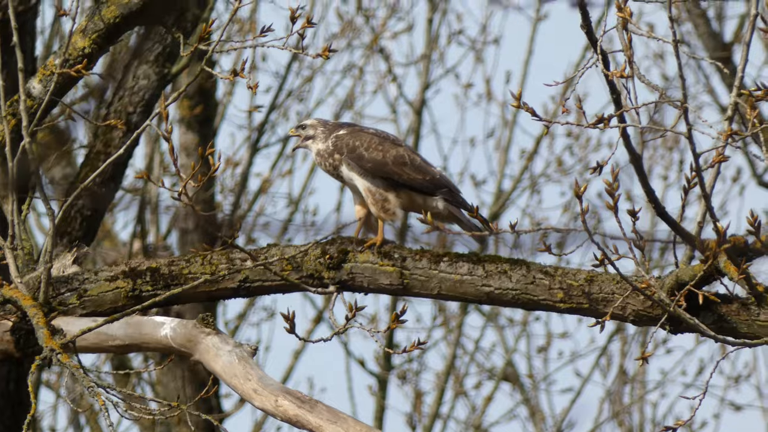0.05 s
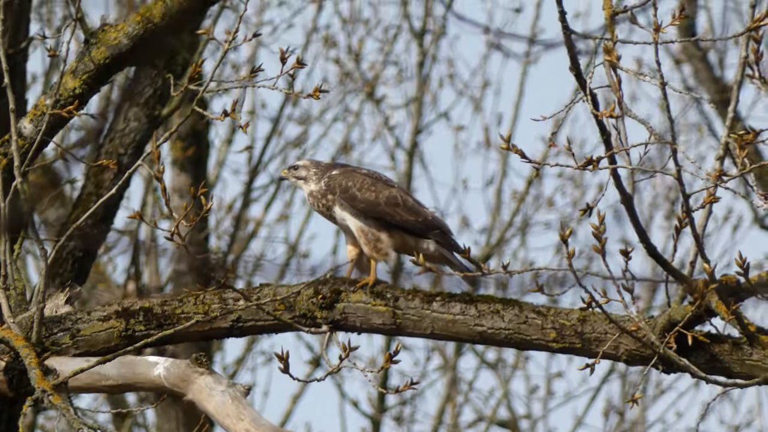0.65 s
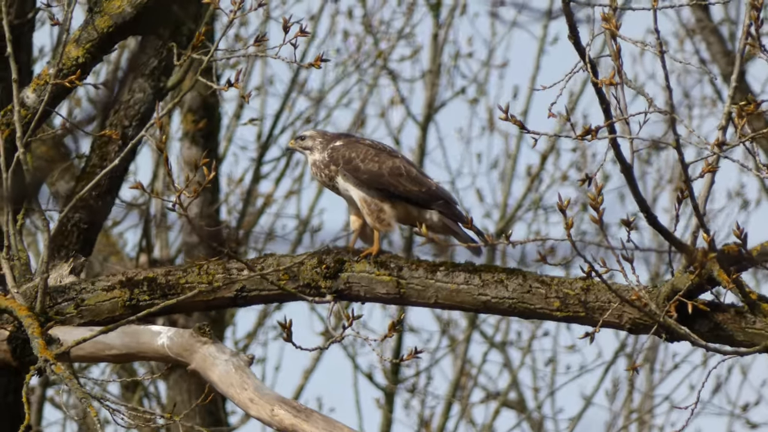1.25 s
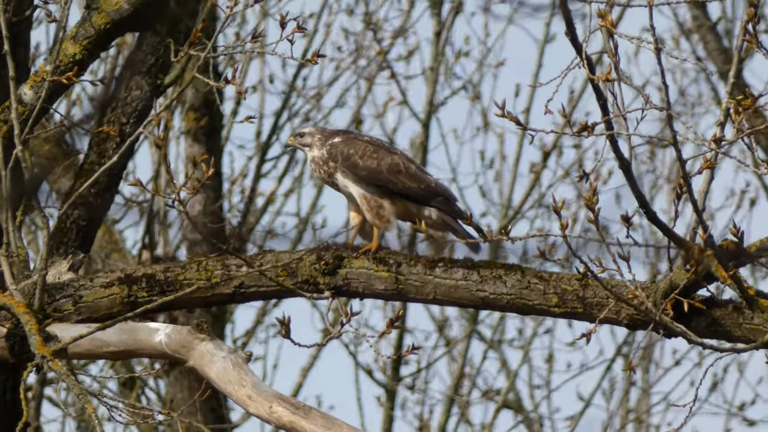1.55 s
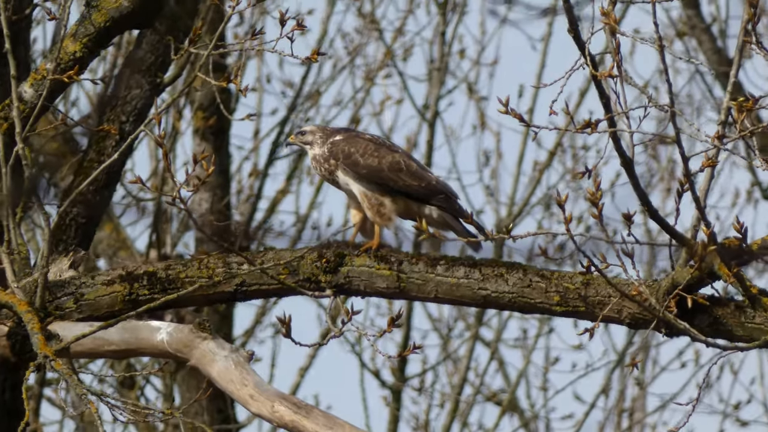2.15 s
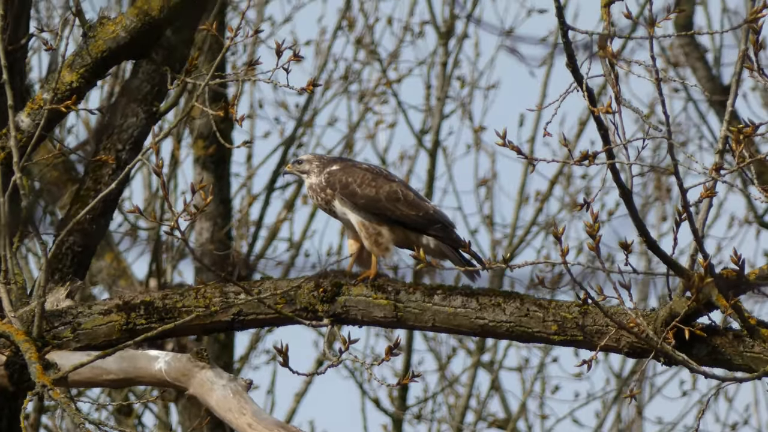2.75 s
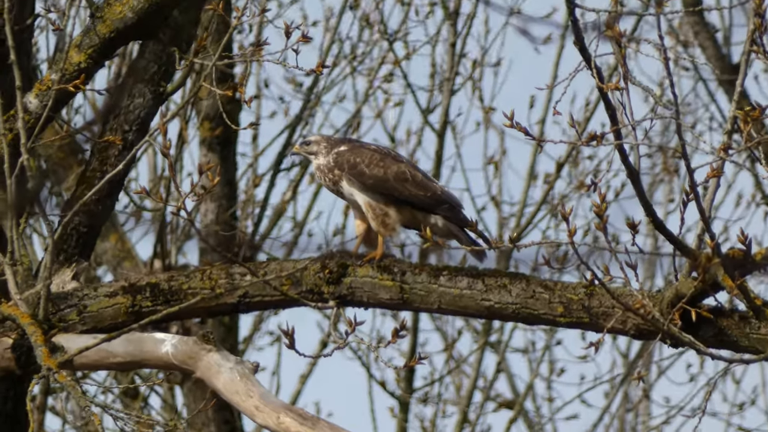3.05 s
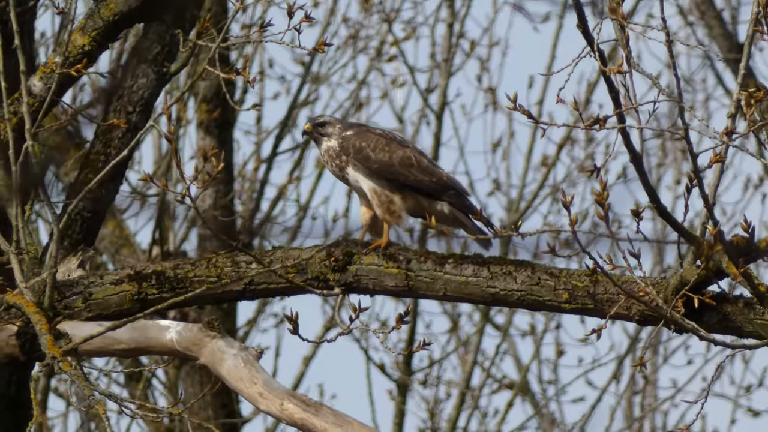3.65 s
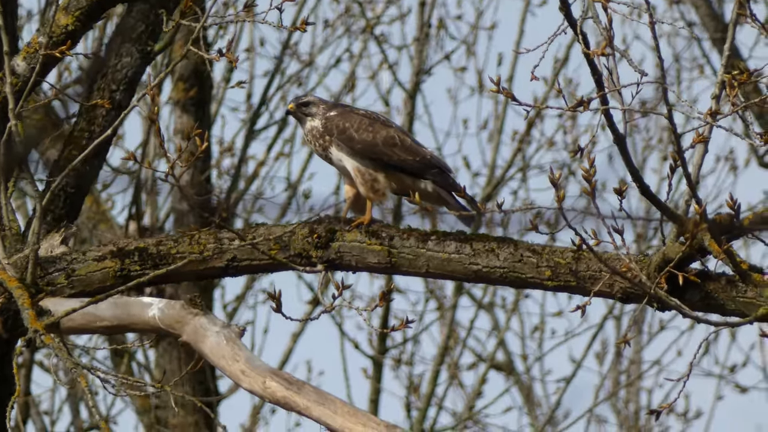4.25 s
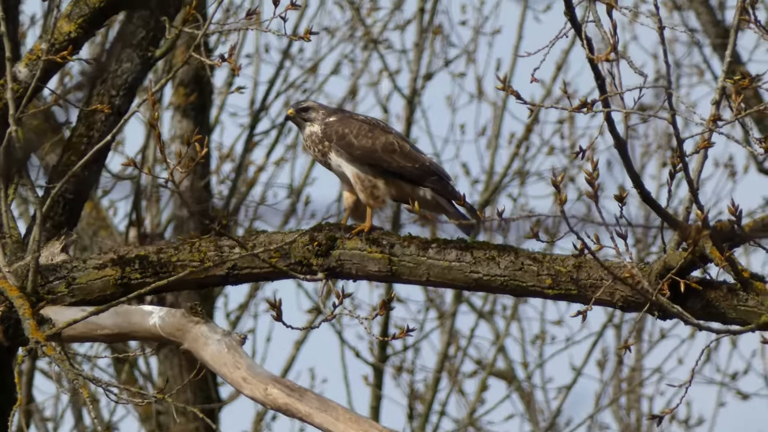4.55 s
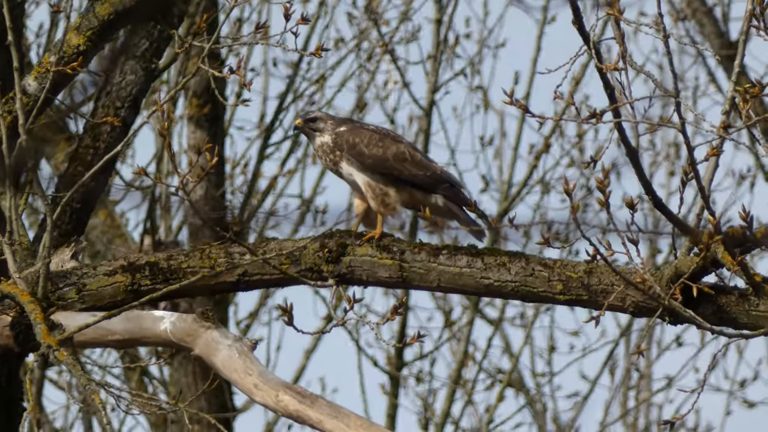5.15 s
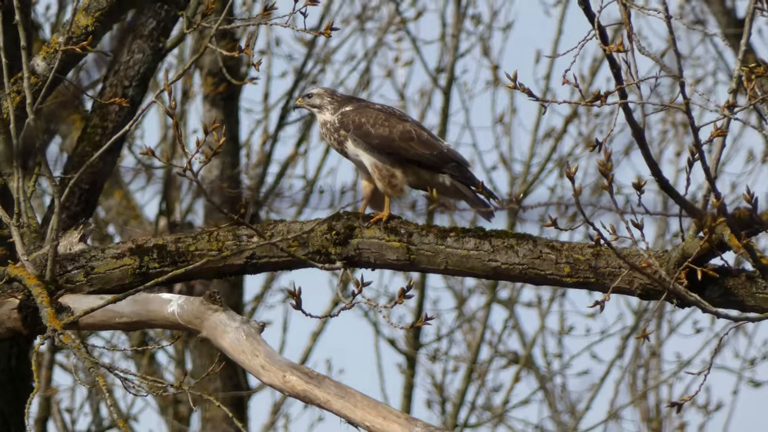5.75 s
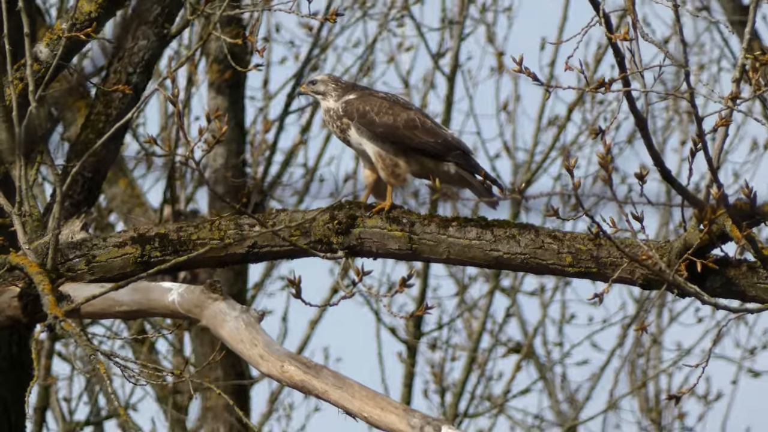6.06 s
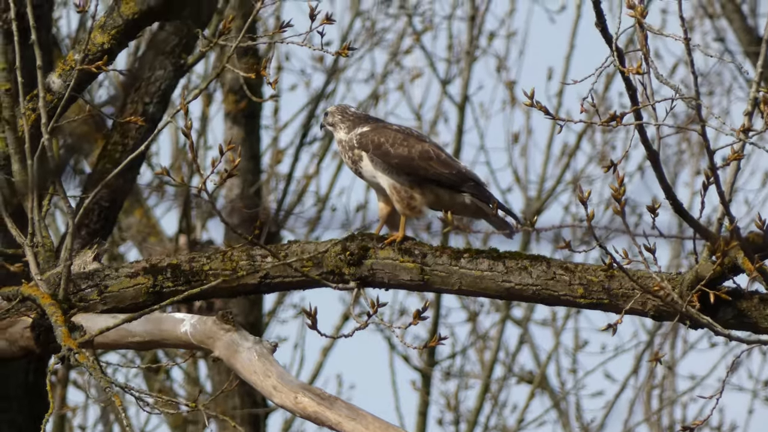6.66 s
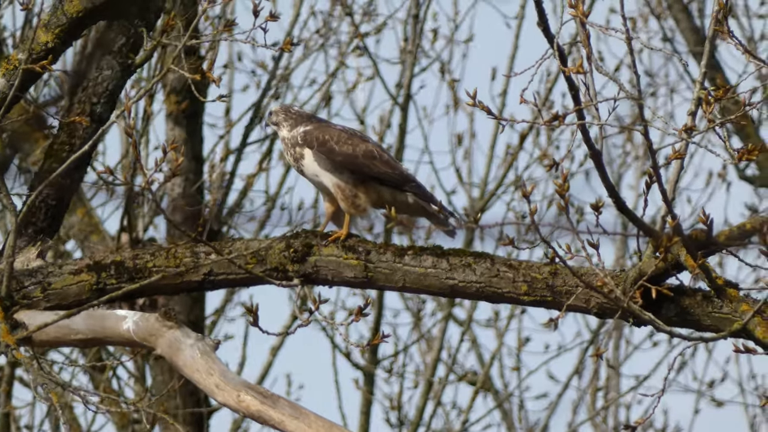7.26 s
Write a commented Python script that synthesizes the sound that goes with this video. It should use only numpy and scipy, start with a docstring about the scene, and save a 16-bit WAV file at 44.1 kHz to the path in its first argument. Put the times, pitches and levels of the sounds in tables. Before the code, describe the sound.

In a quiet wood, a single high, slightly rough buzzard call slides downward and fades among the trees. Distant songbirds follow with pips, gliding whistles and quick falling chirps, growing louder before thinning out near the end. Throughout, the microphone picks up steady hiss, the faint whirr of the camera's lens and a low rumble with light gusts, while soft knocks, dry ticks and brief rustles come from handling.

```python
"""In a wood, a buzzard on a branch gives one hoarse, falling mew, and the trees throw it back.
Its voice is a few harmonics shaped by the throat and open beak. Farther off, small birds twitter in
gliding whistles and fast buzzes, over a low outdoor rumble and a little wind on the microphone.
Close up, a camera adds the soft whirr of its lens motor, hiss, and handling bumps, ticks and rustles."""
import sys
import numpy as np
from scipy import signal
from scipy.fft import rfft, irfft
from scipy.io import wavfile

SR = 44100
rng = np.random.default_rng(int(sys.argv[2]) if len(sys.argv) > 2 else 0)


def transcribe(signal):
    """Save signal, clipped to [-1, 1], as a 16-bit WAV file at the path in sys.argv[1]."""
    frames = np.atleast_2d(signal).T
    limited = np.clip(frames, -1, 1)
    pcm = np.round(limited * 32767).astype(np.int16)
    wavfile.write(sys.argv[1], SR, pcm)


N = 330750
TIME = np.arange(N) / SR
HZ = np.fft.rfftfreq(N, 1 / SR)
SIDES = np.array([[1], [-1]])  # left, right


def amp(db):
    """Decibels to gain."""
    return 10 ** (np.asarray(db) / 20)


def unit(x):
    """Scales to an rms of one."""
    return x / np.sqrt(np.mean(x ** 2) + 1e-20)


def curve_at(points, hz):
    """Reads a curve on a log-frequency axis."""
    freqs, values = np.transpose(points)
    return np.interp(np.log(hz + 1), np.log(freqs + 1), values)


def follow(rows, t=TIME):
    """Every lane of an automation table at the times t."""
    times, *lanes = np.transpose(rows)
    return [np.interp(t, times, lane) for lane in lanes]


def add(mix, s, sound):
    """Drops a sound into the mix at s seconds."""
    part = mix[max(round(s * SR), 0):][:len(sound)]
    part += sound[:len(part)]


def noise(gain):
    """Unit-rms noise, coloured by a gain at each frequency."""
    return unit(irfft(rfft(rng.standard_normal(N)) * gain, N))


def wander(hz):
    """A smooth random modulator that moves up to about hz times a second."""
    return noise(np.exp(-(HZ / hz) ** 2))


# colour of the rumble and of the wind: (frequency [Hz], level [dB])
RUMBLE_EQ = [(25, -50), (50, -37), (80, -25), (120, -5), (155, 0.5), (220, -1.5), (310, -6), (600, -18),
             (1000, -35), (2000, -62)]
WIND_EQ = [(15, -40), (35, -13), (60, -5), (85, 5.5), (130, 5.5), (250, -42)]
# the bed between swells: (time [s], rumble [dB], wind [dB])
CALM = [(0, -65, -78), (4.4, -67, -84.5), (7, -68, -82), (7.5, -71, -77)]
# swells over that bed: (peak time [s], rise [s], fall [s], rumble [dB], wind [dB])
SWELLS = [(1.05, .5, 0.86, -63, -76), (2.52, 0.31, 0.5, -60.5, -64), (3.46, 0.17, 0.15, -51, -57.5),
          (4.22, 0.32, 0.019, -53, -73), (5.43, 0.04, 0.072, -57, -88), (5.85, 0.055, 0.4, -62, -90),
          (6.55, 0.051, 0.1, -57, -82)]

def outdoors(rumble_trim_db=-0.27, wind_trim_db=-1, lumpy_db=2.0, lumpy_hz=14):
    """A low rumble that swells and settles, with soft gusts on the microphone beneath it."""
    power = amp(follow(CALM)) ** 2
    for s, rise_s, fall_s, *peak_db in SWELLS:
        swell = np.exp(-((TIME - s) / np.where(TIME < s, rise_s, fall_s)) ** 2)
        power += np.outer(amp(peak_db) ** 2, swell)
    rumble_level, wind_level = np.sqrt(power) * amp(lumpy_db * wander(lumpy_hz))
    rumble = noise(amp(curve_at(RUMBLE_EQ, HZ))) * rumble_level
    wind = noise(amp(curve_at(WIND_EQ, HZ))) * wind_level
    return rumble * amp(rumble_trim_db) + wind * amp(wind_trim_db)


# resonances of the lens barrel: (frequency [Hz], half-width [Hz], level [dB])
BARREL_MODES = [(477.2, 20.5, 0), (417.6, 47, -3.5), (647, 102, -16.5), (1316, 59, -20.5), (1762, 31, -20),
                (2077, 71, -21)]
# how hard the motor runs, and the hiss that rides with it: (time [s], whirr [dB], hiss [dB])
MOTOR = [(0.0, -57, -71), (1.04, -60.5, -71.5), (1.95, -57, -69.5), (2.25, -56, -68.5), (3.28, -54, -67),
         (3.32, -60.5, -66.5), (3.76, -53.5, -67.5), (4.51, -56, -67.5), (5.2, -54.5, -66.3),
         (6.15, -55.5, -69), (6.47, -53, -68.5), (6.56, -61, -75.5), (6.92, -63.5, -70.5),
         (7.08, -63.5, -74.5), (7.17, -58.5, -72), (7.27, -67.5, -73), (7.5, -64, -72.5)]

def lens_whirr(trim_db=0.36, flutter_db=2.0, flutter_hz=18, low_cut_hz=230):
    """The lens motor's restless small moves ring the resonances of the barrel."""
    barrel = sum(amp(db) / (1 + ((HZ - hz) / width) ** 2) for hz, width, db in BARREL_MODES)
    low_cut = HZ ** 2 / (HZ ** 2 + low_cut_hz ** 2)
    whirr_db, _ = follow(MOTOR)
    return noise(barrel * low_cut) * amp(whirr_db + trim_db + flutter_db * wander(flutter_hz))


# colour of the hiss: (frequency [Hz], level [dB])
HISS_EQ = [(40, -19), (200, -3), (750, 6.5), (1100, 0.5), (1600, 1.5), (2300, 2), (3000, 4.5), (4400, 2.5),
           (6500, 1.5), (7900, -5.5), (9000, -1), (10000, 0.5), (12000, -7), (15000, -15)]
# how alike its two sides are: (frequency [Hz], likeness [1 and above is mono])
HISS_LIKENESS = [(250, .975), (750, .975), (1400, .95), (2500, 1.2), (6000, .975), (8000, 0.7),
                 (10000, 0.66), (12500, 0.5), (15000, 0.3)]
# its lean: (frequency [Hz], left over right [dB])
HISS_PAN = [(6500, 0), (9000, 2), (14000, 3.5)]

def hiss(trim_db=8.5, flicker_db=1.32, flicker_hz=80):
    """A fine flickering hiss, wider and leaning left in the top octave."""
    mid, side = rfft(rng.standard_normal((2, N)))
    likeness = np.clip(curve_at(HISS_LIKENESS, HZ), 0, 1)
    pair = np.sqrt(1 + likeness) * mid + SIDES * np.sqrt(1 - likeness) * side
    colour = amp(curve_at(HISS_EQ, HZ) + SIDES * curve_at(HISS_PAN, HZ) / 2)
    _, hiss_db = follow(MOTOR)
    return unit(irfft(pair * colour, N)) * amp(hiss_db + trim_db + flicker_db * wander(flicker_hz))


# a hand brushing the camera: (time [s], length [s], level [dB])
RUSTLES = [(1.113, 0.068, -61), (6.679, 0.034, -57.5), (7.139, 0.052, -62)]

def rustles(centre_hz=3600, width_hz=1200, grain_db=4, grain_hz=120):
    """A hand rubs the camera in short, grainy strokes."""
    envelope = np.zeros(N)
    for s, length, db in RUSTLES:
        add(envelope, s, amp(db) * np.hanning(int(length * SR)))
    grain = unit(amp(grain_db * wander(grain_hz)))
    band = 1 / (1 + ((HZ - centre_hz) / width_hz) ** 2) ** 2
    return envelope * grain * noise(band)


# colour of the ticks: (frequency [Hz], level [dB])
TICK_EQ = [(800, -41), (3500, 7.5), (6500, 3.5), (8000, -3.5), (10000, 4.5), (12500, -9), (15000, -23)]
# the sharpest ticks: (time [s], level [dB], tilt [dB per octave])
TICKS = [(1.124, -55, -3), (1.259, -51, -2), (2.642, -54, 0), (2.778, -56, 3), (3.258, -47, 2),
         (3.468, -54, 0), (3.503, -49, 0), (4.55, -53, 6), (4.716, -49.5, 4), (4.811, -46, 1),
         (4.853, -53, 0), (4.908, -52.5, -2), (5.101, -50, 4), (5.427, -52, 0), (5.515, -54, 0),
         (5.597, -54, 8), (5.61, -50, 3), (5.619, -48, -2), (5.752, -45, -1), (6.025, -50.5, 0),
         (6.034, -50, -2), (6.043, -48, -2), (6.062, -54, 1), (6.072, -50.5, 2), (6.335, -47, -4),
         (6.691, -49, -5), (6.902, -56, 0), (7.148, -55, -13), (7.249, -55.5, -1)]

def ticks(trim_db=-1, decay_s=0.0049, faint_per_s=14, faint_db=9, crackle_db=4, crackle_hz=900):
    """Dry, crackly handling ticks, each duller or brighter, with many fainter ones among them."""
    t = TIME[:SR // 20]
    hz = np.fft.rfftfreq(len(t), 1 / SR)
    decay = np.exp(-t / decay_s)
    chance, size = rng.random((2, N))
    _, hiss_db = follow(MOTOR)
    faint_hits = (chance < faint_per_s / SR) * size * amp(hiss_db + faint_db)
    out = signal.fftconvolve(faint_hits, decay)[:N] * noise(amp(curve_at(TICK_EQ, HZ)))
    octaves = np.log2(np.maximum(hz, 800) / 7000)  # the tilt pivots at 7 kHz, flat below 800 Hz
    for s, db, tilt_db in TICKS:
        colour = amp(curve_at(TICK_EQ, hz) + tilt_db * octaves)
        burst = unit(irfft(rfft(rng.standard_normal(len(t))) * colour, len(t)))
        add(out, s, amp(db + trim_db) * decay * burst)
    return out * unit(amp(crackle_db * wander(crackle_hz)))


# firm nudges of the camera: (time [s], level [dB], thud pitch [Hz], knock balance [dB])
BUMPS = [(2.745, -40.5, 85, -20), (3.321, -42.5, 111, -18), (3.489, -42, 131, -11), (3.675, -39, 190, 0),
         (3.708, -36, 182, 0), (4.155, -36.5, 200, -1), (4.241, -40, 189, -20), (4.018, -48, 172, -8),
         (5.424, -47, 183, -18), (6.49, -44.5, 170.5, -13), (6.773, -48, 210, -4), (6.563, -42, 189, 2),
         (6.698, -42, 215, 2), (6.73, -40, 230, 6)]
# light taps on its body: (time [s], level [dB], pitch [Hz])
TAPS = [(7.015, -50.5, 587), (7.111, -47, 635), (7.288, -49.5, 730)]

def bumps(thud_s=0.0033, knock_hz=450, knock_s=0.0024, knock_boost_db=4, spread=0.071, tap_s=0.00093):
    """Each nudge of the camera gives a damped thud and a shorter knock; a light tap only knocks."""
    out, t = np.zeros(N), TIME[:SR // 10]

    def ring(hz, rise_s):
        """A few cycles that swell and die."""
        return t / rise_s * np.exp(1 - t / rise_s) * np.sin(2 * np.pi * hz * t)

    for s, db, thud_hz, balance_db in BUMPS:
        detune = np.exp(spread * rng.standard_normal())
        knock_gain = amp(balance_db + knock_boost_db)
        hit = ring(thud_hz, thud_s) + knock_gain * ring(knock_hz * detune, knock_s)
        add(out, s, amp(db) * hit / np.hypot(1, knock_gain))
    for s, db, hz in TAPS:
        add(out, s, amp(db) * ring(hz, tap_s))
    return signal.sosfilt(signal.butter(2, 75, "high", fs=SR, output="sos"), out)


# the wood's reverb tails: (delay [s], around the buzzard [dB], around the songbirds [dB])
WOOD_TAILS = [(0, 3, 5), (.02, -0.5, -2), (.07, 0, -6.5), (.15, -4, -9), (.2, -4.5, -12), (.27, -3.5, -17),
              (.32, -9.5, -25), (.5, -15, -34), (.9, -29.5, -43)]

def wood(x, around, echoes_per_s=2000):
    """Trunks and branches scatter a sound into a second of small, fading echoes."""
    buzzard_db, songbirds_db = follow(WOOD_TAILS, TIME[:SR])
    tail = amp({"buzzard": buzzard_db, "songbirds": songbirds_db}[around])
    echoes = rng.choice([-1., 1.], SR) * (rng.random(SR) < echoes_per_s / SR) * tail
    return signal.fftconvolve(x, echoes / np.linalg.norm(echoes))[:N]


def twitter(count=24, from_s=.8, to_s=6.0, low_hz=3600, high_hz=5200, note_s=0.0614, max_glide=0.123,
            first_db=-71, last_db=-60, buzz=0.6, echo_db=4):
    """Faint, buzzy random notes from deep in the wood, growing louder."""
    for k, (when, height, slope, hoarse) in enumerate(rng.random((count, 4))):
        progress = (k + when) / count
        s = from_s + progress * (to_s - from_s)
        hz = low_hz * (high_hz / low_hz) ** (height ** 2)
        db = first_db + progress * (last_db - first_db)
        yield s, note_s, hz, max_glide * (2 * slope - 1), 1, db, buzz * (.5 + hoarse), echo_db


# a far bird's short pips, on a high and a low note: (time [s], pitch [Hz], level [dB])
PIPS = [(2.525, 4420, -59.5), (2.935, 4520, -60), (3.36, 4440, -57), (3.63, 3280, -65.5),
        (3.756, 4490, -54.5), (4.095, 3344, -61), (4.115, 4475, -55.5), (4.198, 4470, -57),
        (4.28, 4435, -59), (4.505, 3370, -62.5), (4.601, 4390, -50.5), (5.445, 4390, -52),
        (6.338, 3225, -62.5), (6.355, 4396, -55)]
# a nearer bird's chips, each a lead-in buzz that breaks into a steep downward sweep:
# (time [s], length [s], top [Hz], end [Hz], bend [exponent], level [dB], lead-in level [dB])
CHIPS = [(3.225, .036, 4604, 3660, 1.02, -53.5, -64), (3.352, 0.039, 4300, 3250, 1.12, -52.5, -69),
         (3.764, 0.04, 4110, 3180, 1.3, -53, -68), (4.163, 0.034, 4290, 3180, 1.3, -54.5, -62),
         (4.824, 0.033, 4560, 3860, 0.94, -46, -60), (5.039, 0.035, 4780, 3700, 1.42, -40.5, -47.5),
         (5.575, .043, 4810, 3290, .75, -48.5, -62), (5.878, 0.042, 4820, 3415, 1, -45, -52.5),
         (6.018, 0.034, 4700, 3460, 1.014, -47.5, -51), (6.206, 0.039, 4870, 3120, 0.6, -47, -54)]
# its short upward slurs: (time [s], start [Hz], level [dB])
SLURS = [(4.706, 4740, -53), (4.9, 3380, -50.5), (5.125, 4680, -51.5), (5.257, 4115, -47),
         (5.378, 3367, -51), (5.469, 4234, -46), (6.153, 3580, -51.5)]
# held whistles: (time [s], length [s], start [Hz], end [Hz], level [dB], echo bias [dB])
WHISTLES = [(0.608, .04, 3550, 3870, -63, 2), (.65, 0.09, 3990, 4010, -69, -1),
            (1.09, 0.056, 7300, 7100, -72, 2), (1.329, 0.08, 5700, 5550, -73, -1),
            (1.676, 0.029, 7040, 5500, -67, 0), (1.81, 0.057, 7240, 7230, -66.5, -4),
            (1.979, 0.06, 6700, 5800, -56.5, -4), (2.09, .108, 3812, 3756, -51, -4),
            (2.215, .05, 2770, 2730, -69, -2), (2.629, 0.056, 5650, 5530, -65, 3),
            (4.537, 0.057, 3960, 4140, -52.5, 0), (5.144, 0.028, 5460, 5130, -52, -4),
            (5.161, 0.058, 3630, 3560, -52, 1), (5.306, 0.056, 3260, 3200, -57.5, -3),
            (5.405, 0.021, 6900, 5500, -59, 0), (5.422, 0.04, 5430, 5760, -49.5, -2.5),
            (5.754, 0.088, 4630, 4090, -46.5, 1), (5.759, 0.064, 3255, 3300, -56, -2),
            (6.076, 0.022, 5080, 5180, -52, -6), (7.076, 0.1, 2674, 2410, -71, -4)]
# hoarse phrases: (time [s], length [s], start [Hz], end [Hz], level [dB], buzz [0-1])
BUZZES = [(1.02, 0.31, 4660, 4200, -74, .6), (1.44, 0.16, 5560, 4820, -68.5, .8),
          (1.554, 0.44, 4410, 3903, -63.5, .9), (1.95, .09, 3340, 3240, -62, .25),
          (2.199, 0.24, 3205, 3144, -66.5, .35), (2.45, .14, 3180, 3260, -63, .22),
          (2.656, 0.1, 3765, 3980, -60, .5), (3.094, 0.066, 3900, 3890, -56.5, .5),
          (4.009, 0.088, 4010, 4490, -56.5, .6), (4.607, 0.054, 3824, 3980, -53, .7),
          (4.923, 0.036, 6000, 5340, -56.5, .9), (5.621, 0.032, 5300, 4760, -52, .9),
          (5.645, 0.065, 4750, 4400, -48.5, .8), (5.985, 0.04, 4850, 5090, -54, .8),
          (6.14, 0.042, 4650, 4730, -56, .8)]

def song_notes(pip_s=0.055, pip_sag=.015, pip_echo_db=-0.5, pure_buzz=0.037, whistle_bend=2.19,
               lead_s=0.052, lead_hz=4360, lead_rise=0.089, lead_buzz=0.71, buzz_echo_db=4,
               chip_buzz=.16, chip_echo_db=0.3, slur_s=0.0294, slur_rise=0.11, slur_bend=1.52):
    """The small birds' cue list, note by note; a bend under 1 glides fastest at first."""
    for s, hz, db in PIPS:
        yield s, pip_s, hz, -pip_sag, 1, db, pure_buzz, pip_echo_db
    for s, length, hz, end_hz, bend, db, lead_db in CHIPS:
        yield s - lead_s, lead_s, lead_hz, lead_rise, 1, lead_db, lead_buzz, buzz_echo_db
        yield s, length, hz, end_hz / hz - 1, bend, db, chip_buzz, chip_echo_db
    for s, hz, db in SLURS:
        yield s, slur_s, hz, slur_rise, slur_bend, db, chip_buzz, chip_echo_db
    for s, length, hz, end_hz, db, echo_db in WHISTLES:
        yield s, length, hz, end_hz / hz - 1, whistle_bend, db, pure_buzz, echo_db
    for s, length, hz, end_hz, db, buzz in BUZZES:
        yield s, length, hz, end_hz / hz - 1, 1, db, buzz, buzz_echo_db
    yield from twitter()


def songbirds(buzz_depth_hz=380, flutter_hz=400, waver=0.0031, waver_hz=200, edge_s=.006, buzz_fade=0.31,
              near_db=-51, wet_slope=0.29, blur_rad=0.76, blur_hz=70):
    """Crisp gliding whistles and softer-edged fast buzzes; returns the direct sound and an echo send."""
    direct, send = np.zeros(N), np.zeros(N)
    flutter, drift, sway = wander(flutter_hz), wander(waver_hz), wander(blur_hz)
    for s, length, start_hz, glide, bend, db, buzz, echo_db in song_notes():
        progress = np.linspace(0, 1, int(length * SR))
        span = slice(int(s * SR), int(s * SR) + len(progress))
        pitch = start_hz * (1 + glide * progress ** bend) * (1 + waver * drift[span])
        pitch += buzz * buzz_depth_hz * flutter[span]
        phase = 2 * np.pi * np.cumsum(pitch) / SR
        fades = signal.windows.tukey(len(progress), 2 * edge_s / length + buzz_fade * buzz)
        level = np.sqrt(2) * amp(db) * fades
        # faint notes come from deeper in the wood: more of them is echo, blurred in pitch
        wet_db = wet_slope * (near_db - db) + echo_db
        add(direct, s, level * np.sin(phase) * amp(-wet_db / 2))
        add(send, s, level * np.sin(phase + blur_rad * sway[span]) * amp(wet_db / 2))
    return direct, send


def mew_pitch(t, length_s, scoop_hz=215, scoop_s=.025, top_hz=1367.5, hold_s=.098,
              rest_hz=1188, sag_s=.094, sink_hz_per_s=110, drop_hz=70, drop_s=0.0139):
    """The mew scoops up, holds, sags towards a slowly sinking resting pitch and drops as it ends."""
    falling_s = np.maximum(t - hold_s, 0)
    scoop = scoop_hz * np.exp(-(t / scoop_s) ** 2)
    sag = (top_hz - rest_hz) * np.exp(-falling_s / sag_s)
    drop = drop_hz * np.exp((t - length_s) / drop_s)
    return rest_hz + sag - sink_hz_per_s * falling_s - scoop - drop


# resonances of the buzzard's throat and open beak: (frequency [Hz], level [dB])
THROAT_EQ = [(1150, -30), (1400, -15), (1900, -7), (2330, -0.5), (2650, -1.5), (2780, -0.5), (3500, -23.5),
             (3850, -21.5), (4120, -13), (4650, -39), (5150, -42), (5480, -18.5), (5900, -34), (6170, -15)]
# it pushes hard twice, then quavers to the end: (time [s], level [dB])
EFFORT = [(0, -60), (.03, -58.5), (.065, -60), (.13, -45), (.19, -50), (.27, -54), (.3, -46), (.36, -44.5),
          (.42, -61), (.5, -54.5), (.56, -59), (.59, -52), (.64, -52.5), (.66, -53), (.685, -45.5),
          (.70, -71)]

def buzzard(length_s=.70, jitter=.0014, shimmer_db=1.8, unsteady_hz=150, hoarse_rad=0.46, hoarse_hz=70,
            strain_s=0.23, strain_jitter=0.0098, strain_hz=500, bright_db=5.0, split_db=-10,
            rasp=.1, rasp_hz=430, rasp_drift=0.097):
    """A slightly hoarse harmonic voice whose second partial sits on the throat's resonance."""
    on = TIME < length_s
    t = TIME[on]
    strain = np.exp(-(t / strain_s) ** 2)  # the strained attack is brighter and rougher
    pitch = mew_pitch(t, length_s) * (1 + jitter * wander(unsteady_hz)[on])
    level = amp(follow(EFFORT, t)[0] + shimmer_db * wander(unsteady_hz)[on])
    pitch *= 1 + strain_jitter * strain * wander(strain_hz)[on]
    phase = 2 * np.pi * np.cumsum(pitch) / SR

    def partial(k):
        """One line of the voice, coloured by the throat; lines off the resonance are less steady."""
        slip = hoarse_rad * min(abs(k - 2), 1) * wander(hoarse_hz)[on]
        db = curve_at(THROAT_EQ, k * pitch) + bright_db * strain * (k - 1.5)
        return amp(db) * np.sin(k * phase + slip)

    voice = sum(map(partial, (1, 2, 3, 4)))
    # under strain, strong and weak cycles alternate, adding lines halfway between the harmonics
    voice += amp(split_db) * strain * sum(map(partial, (2.5, 3.5, 4.5)))
    # a fast tremor of the membranes puts faint sidebands around each line
    tremor_hz = rasp_hz * (1 + rasp_drift * wander(unsteady_hz)[on])
    tremor = 1 + rasp * np.sin(2 * np.pi * np.cumsum(tremor_hz) / SR)
    mew = np.sqrt(2) * level * voice * tremor * signal.windows.tukey(len(t), .02)
    return np.pad(mew, (0, N - len(t)))


def scene(mew_echo_db=1, beam_hz=4900, song_db=-1.1, song_echo_db=-1.0, width_db=-29):
    """Birds and their echoes, straight ahead, over the outdoor bed and the camera's own sounds."""
    mew = buzzard()
    song, song_send = songbirds()
    # the beak beams its overtones forward, so the surrounding trees receive a duller call
    mew_send = irfft(rfft(mew) / np.hypot(1, (HZ / beam_hz) ** 4), N)
    birds = mew + amp(mew_echo_db) * wood(mew_send, around="buzzard")
    birds += amp(song_db) * song + amp(song_echo_db) * wood(song_send, around="songbirds")
    centre = birds + outdoors() + lens_whirr()
    # the two microphone capsules sit close together: only a trace of scattered sound gives width
    side = amp(width_db) * wood(centre, around="songbirds") * SIDES
    return centre + side + bumps() + ticks() + rustles() + hiss()


def record(dry, cutoff_hz=15500):
    """A steep high cut on the whole mix."""
    lowpass = signal.firwin(511, cutoff_hz, window=("kaiser", 9), fs=SR)
    return signal.oaconvolve(dry, lowpass[None], "same")


dry = scene()
out = record(dry)
transcribe(out)
```